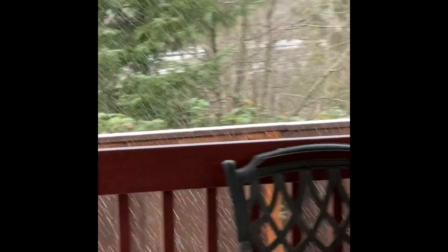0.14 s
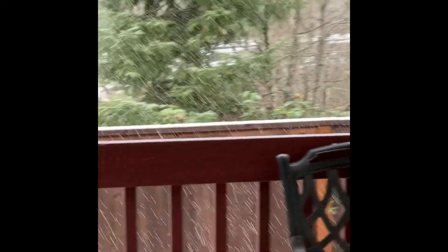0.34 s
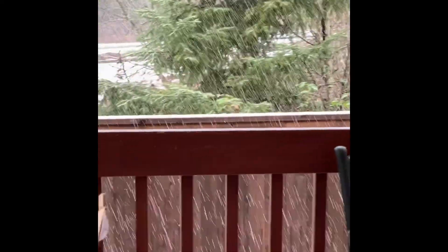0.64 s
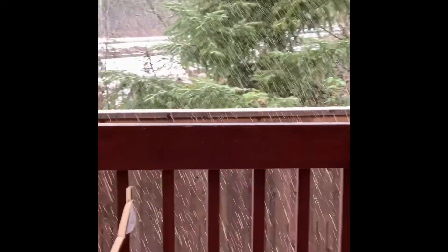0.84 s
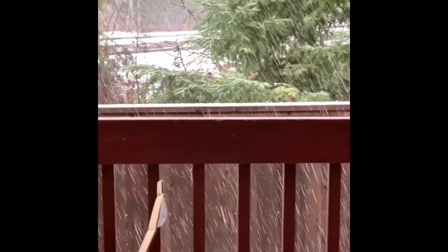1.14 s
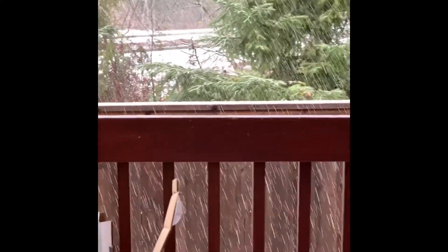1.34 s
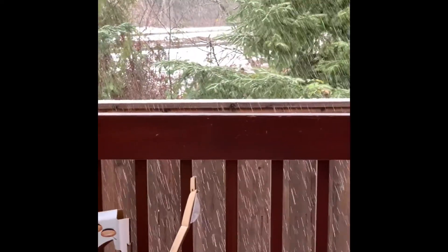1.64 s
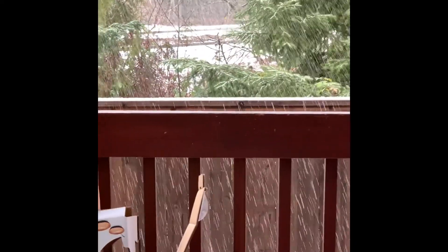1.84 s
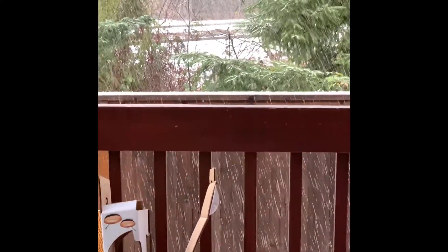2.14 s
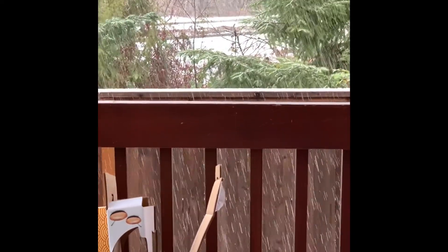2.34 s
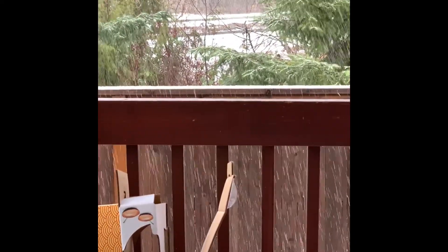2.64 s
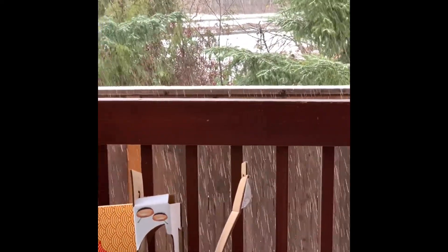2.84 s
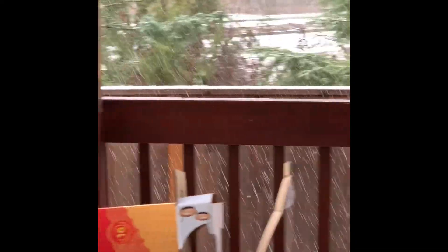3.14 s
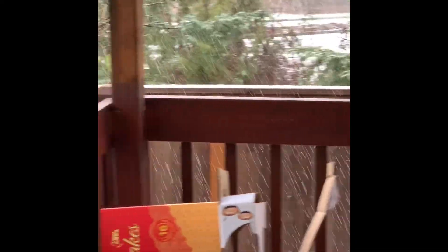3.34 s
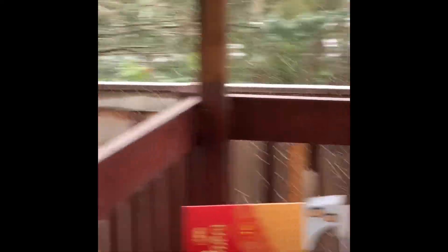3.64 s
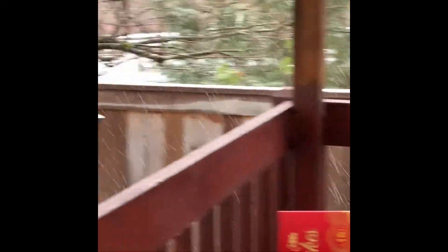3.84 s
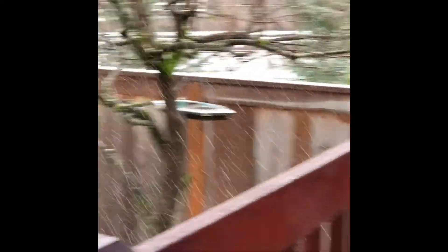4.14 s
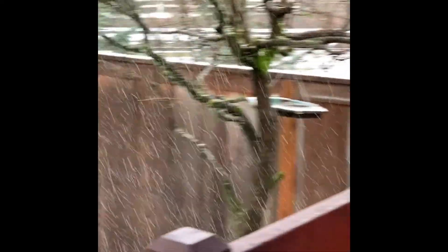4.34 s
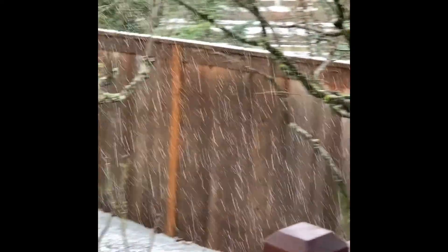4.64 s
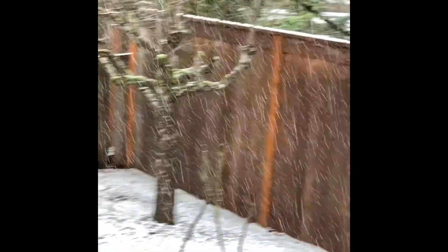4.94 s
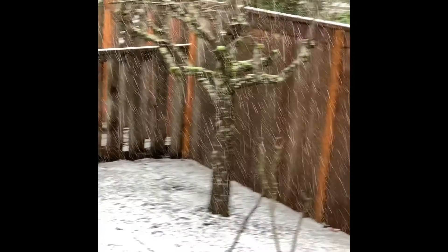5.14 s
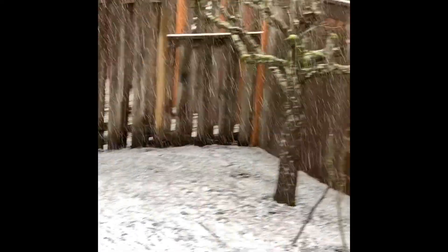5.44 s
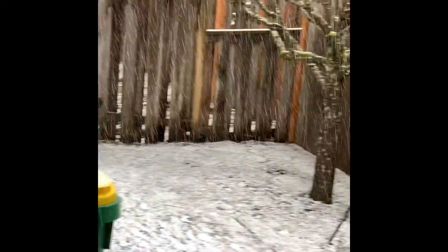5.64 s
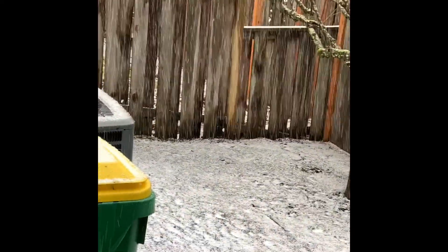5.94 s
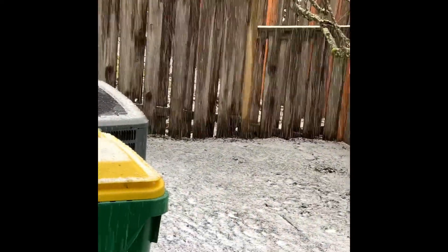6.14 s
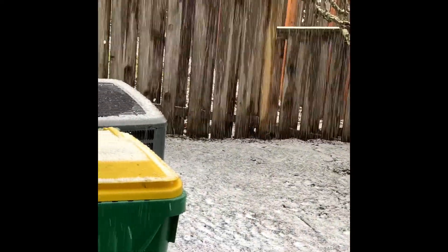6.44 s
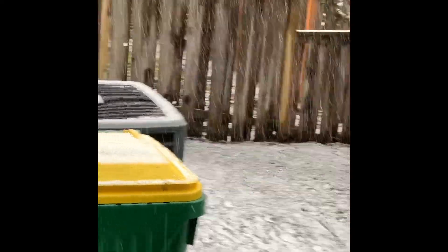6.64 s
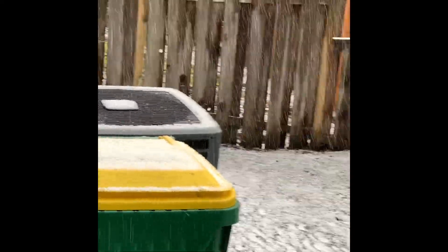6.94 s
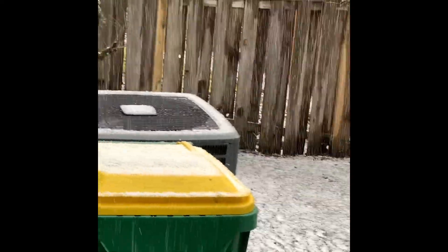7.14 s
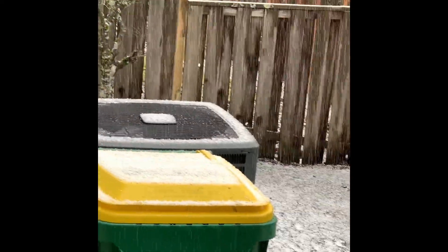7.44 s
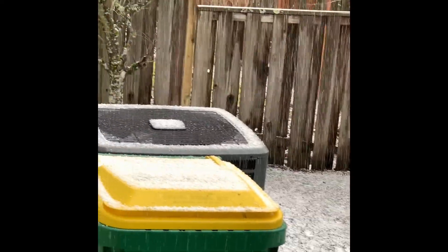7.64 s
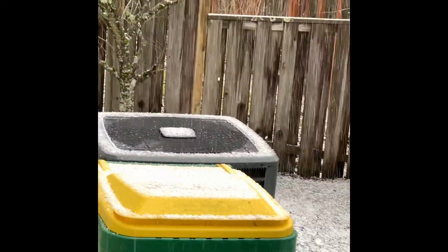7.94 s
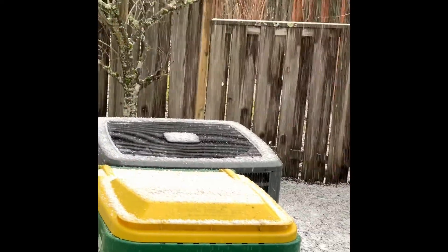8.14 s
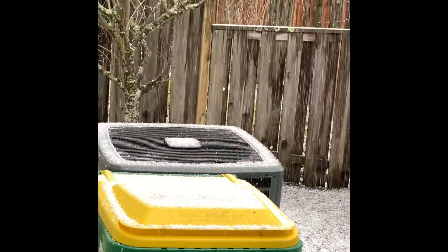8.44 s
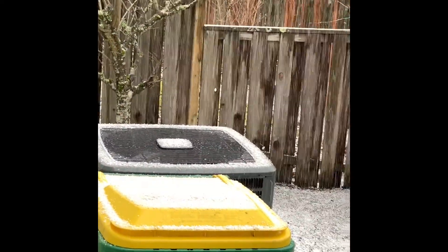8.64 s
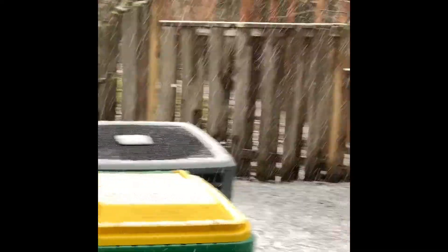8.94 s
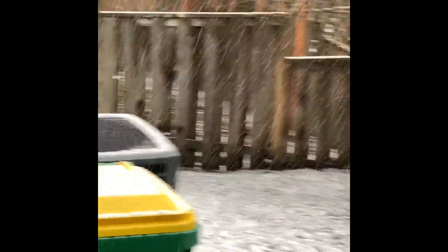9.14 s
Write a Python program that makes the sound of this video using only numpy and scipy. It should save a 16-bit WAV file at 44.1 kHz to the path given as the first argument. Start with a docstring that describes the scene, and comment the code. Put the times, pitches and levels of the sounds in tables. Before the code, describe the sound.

A thick shower of snow pellets falls on a backyard, heard from a wooden deck on a handheld stereo microphone. A bright, fine hiss from grass blends with a lower patter on fence and boards. Crisp ticks, dry woody taps and tiny pings scatter close by. A tiny rising gurgle passes early; soft wind bumps the microphone midway. The shower gradually weakens, over a very faint distant rumble and drone.

```python
"""A backyard under a shower of snow pellets, heard from a wooden deck through a phone's two microphone ports.
Far grains, as random coloured impulses, merge into a hiss on the lawn and a patter on fence and deck.
Near pellets tick, hop, tap and ping as short rings with bursts of noise and diffuse echoes.
The shower sinks as the phone turns from deck to lawn. Two gliding sines make a small rising gurgle;
filtered noise makes a low rumble and soft gusts, and noise with two wavering sines a distant drone."""
import sys
import numpy as np
from scipy import signal
from scipy.fft import rfft, irfft
from scipy.io import wavfile
from scipy.ndimage import map_coordinates

SR = 44100
rng = np.random.default_rng(int(sys.argv[2]) if len(sys.argv) > 2 else 0)


def unload_audio(sound):
    """Save the sound as a 16-bit wav file, at the path given as the first command line argument."""
    columns = np.transpose(np.atleast_2d(sound))
    # keep every value between -1 and 1, then stretch to whole-number steps
    steps = np.round(np.clip(columns, -1, 1) * 32767)
    wavfile.write(sys.argv[1], SR, steps.astype(np.int16))


N = 410130
TIME = np.arange(N) / SR  # seconds
FREQS = np.arange(N // 2 + 1) * SR / N  # Hz

# loudness of the whole shower, sinking as the phone turns toward the lawn: t/s, level/dB
SHOWER_LEVEL = [(0, -1), (.7, -1), (1.7, -1.45), (2.7, -1), (4.7, -2.06), (6.5, -3.5), (8.1, -4.5),
                (9.3, -4.5)]
# relative spectrum of far pellets on grass: f/Hz, level/dB per Hz
LAWN_SPECTRUM = [(1500, -11.5), (3500, -8), (5200, 4), (7000, 1.5), (9300, 4), (12000, 2), (14000, -1),
                 (15000, -21)]
LAWN_DB = -38  # at 0 dB of shower


def lawn(swell_db):
    """Far pellets on grass and needles merge into a fine hiss, broken by quick spatters."""
    impulses = grains(per_s=5000, scatter_db=1.5)
    hiss = patchy(colour(impulses, LAWN_SPECTRUM), patchy_db=3.5, per_s=30, width_hz=396)
    spatter_db = 1.6 * clumps(per_s=80, fade_s=.0045)
    return spread(hiss) * undb(LAWN_DB + curve(SHOWER_LEVEL) + swell_db + spatter_db)


# relative spectrum of far pellets on wood: f/Hz, level/dB per Hz
WOOD_SPECTRUM = [(200, -14), (450, -3), (780, -0.5), (1150, -2.5), (1550, -1.5), (2000, -2.5), (2700, -1),
                 (3800, -3), (5500, -12), (9000, -12.5)]
WOOD_DB = -37  # at 0 dB of shower
WOOD_SWELL_SHARE = 0.36  # how much of the shower's swell reaches the patter


def fence(swell_db):
    """Pellets on fence and deck patter lower and coarser than those on the lawn."""
    impulses = grains(per_s=2400, scatter_db=1.0)
    patter = patchy(colour(impulses, WOOD_SPECTRUM), patchy_db=2.5, per_s=35, width_hz=238.8)
    spatter_db = .5 * clumps(per_s=60, fade_s=0.02)
    level_db = WOOD_DB + curve(SHOWER_LEVEL) + WOOD_SWELL_SHARE * swell_db + spatter_db
    return spread(patter) * undb(level_db)


# thick clumps of pellets: t/s, swell level/dB
FLURRIES = [(.73, 0.5), (1.17, 3), (2.75, -0.5), (3.09, 2.5), (3.79, 0), (4.76, 6), (5.11, 2.5),
            (5.95, 6.5), (6.44, 2.5), (7.31, 5), (7.96, 2.5), (8.22, 3.5), (8.29, 3), (8.92, -0.5)]
FLURRY_WIDTH_S = .022


def flurries(surge_db, per_s):
    """Decibels by which the shower swells: thick clumps over a restless surge."""
    thick_db = sum(db * bell(s, FLURRY_WIDTH_S) for s, db in FLURRIES)
    return thick_db + surge_db * clumps(per_s, fade_s=0.02)


# sharp pellets close by: t/s, tick level/dB, tick f/Hz, board knock level/dB
TICKS = [(0.02, -17, 9500, -39), (0.0515, -18, 10000, -38), (0.1012, -17, 11500, -40),
         (0.128, -18, 11000, -40), (0.1412, -23, 9500, -35), (0.2183, -18, 9500, -39),
         (0.3034, -18, 10000, -25), (0.339, -15, 9000, -38), (0.349, -13, 10300, -37),
         (0.64, -15, 9500, -38), (0.7093, -9, 10300, -27), (0.7225, -15, 9500, -30),
         (0.742, -9.5, 9400, -27), (0.759, -20, 10000, -38), (0.7884, -14.5, 8800, -32),
         (0.799, -11.5, 9100, -36), (1.0355, -18, 10500, -42), (1.148, -10.5, 9900, -38),
         (1.1736, -14.5, 10500, -38), (1.284, -10.5, 11200, -19.5), (1.32, -1, 11400, -18),
         (1.438, -18, 10000, -38), (1.602, -10.5, 11000, -36), (1.6397, -14, 9600, -22),
         (1.7948, -12, 9700, -28), (1.8985, -12.5, 8300, -27.5), (1.9515, -20, 10000, -38),
         (2.058, -19, 7900, -28), (2.334, -16, 8000, -35), (2.436, -10, 10500, -25),
         (2.4454, -11, 10500, -38), (2.4937, -9.5, 9800, -34), (2.601, -10, 8400, -28),
         (2.6344, -9.5, 10100, -36), (2.7255, -14, 9000, -38), (2.7367, -7.5, 10000, -40),
         (2.8503, -9, 9700, -38), (2.894, -14, 9150, -40), (3.026, -7.5, 9000, -23),
         (3.0746, -12, 10300, -22), (3.1532, -8, 10400, -30), (3.1958, -9, 10300, -26),
         (3.279, -10, 10800, -27), (3.3858, -7.5, 8500, -44), (3.7062, -8.5, 9500, -46),
         (3.729, -9.5, 11500, -46), (3.805, -14, 10600, -28), (3.9842, -10, 10400, -30),
         (4.0085, -12, 10000, -38), (4.041, -11, 11500, -38), (4.0545, -17, 9800, -34),
         (4.0673, -11, 10200, -36), (4.3833, -13, 9200, -38), (4.4204, -6, 9600, -43),
         (4.5583, -10, 10400, -38), (4.644, -11.5, 8700, -34), (4.7352, -14, 9500, -34),
         (4.953, -15, 9000, -22), (4.9662, -9.5, 10000, -24), (5.0905, -10, 11000, -34),
         (5.2538, -23, 8000, -25), (5.2683, -21, 7300, -32), (5.9906, -13.5, 9000, -25),
         (6.269, -18, 9500, -38), (6.2925, -13, 9200, -34), (6.3652, -19, 7650, -25),
         (6.4875, -11.5, 10600, -17), (6.7878, -17, 11000, -38), (6.8255, -18, 10000, -37),
         (7.154, -13, 9300, -37), (7.239, -17, 10300, -30), (7.343, -16.5, 9300, -36),
         (7.412, -16.5, 8500, -40), (7.4905, -20, 10100, -39.5), (8.0092, -21, 9700, -36),
         (8.2785, -24, 9500, -24), (8.4314, -18, 9700, -42), (8.3386, -10.5, 7400, -41),
         (8.4574, -8, 10200, -38), (8.5795, -12, 9800, -37), (8.8694, -6.5, 8600, -40),
         (8.913, -11, 11000, -45), (8.9303, -11, 9400, -42), (8.948, -18, 8500, -35),
         (8.974, -16, 8200, -23.5), (9.111, -17, 8400, -35), (9.2756, -10, 10200, -47)]
# echo energy against the direct blow, for sharp ticks and for woody taps
TICK_ECHO_DB, TAP_ECHO_DB = -5.5, -1
HOP_LOSS_DB = 14  # how much softer a pellet lands after its bounce


def near_ticks():
    """Crisp ticks within reach knock the board; each pellet hops once and lands again more softly."""
    s, tick_db, hz, knock_db = np.transpose(TICKS)
    ticks = impacts(zip(s, tick_db, hz), cycles=.9, crack=.8, crack_s=.0006, bright=.7,
                    echo_db=TICK_ECHO_DB, echo_t60_s=.085)
    boards = zip(s, knock_db, rng.uniform(2350, 5300, len(s)))
    knocks = impacts(boards, cycles=1.0, crack=0.55, crack_s=0.0024, bright=3.7,
                     echo_db=TAP_ECHO_DB, echo_t60_s=0.11)
    hop_s = rng.uniform(0.02, 0.079, len(s))
    hops = np.column_stack([s + hop_s, tick_db - HOP_LOSS_DB, hz])
    others = stray(top_db=-15, range_db=8.5, low_hz=7000, high_hz=12500, count=850)
    small = impacts(np.vstack([hops, others]), cycles=.7, crack=.9, crack_s=.0004, bright=.75,
                    echo_db=-2.5, echo_t60_s=.025)
    return ticks + knocks + small


# duller pellets on rail and boards: t/s, level/dB, ring f/Hz
TAPS = [(0.077, -26, 2820), (0.301, -22, 3240), (0.407, -26, 1380), (0.9102, -21, 3160),
        (1.174, -18.5, 2640), (1.963, -22.5, 3200), (2.746, -28, 2300), (2.756, -25, 1900),
        (2.762, -27, 950), (3.545, -29, 1900), (3.623, -20, 2520), (4.054, -28, 1020), (4.055, -24, 2900),
        (4.148, -21, 3280), (4.274, -26, 1540), (4.287, -23, 2500), (4.29, -26, 1150), (4.368, -32, 1700),
        (4.607, -28, 1450), (5.09, -22, 3100), (5.121, -19, 3200), (6.477, -18.5, 3370), (6.518, -21, 2470),
        (7.044, -22.5, 3000), (7.969, -21, 3880), (9.032, -20, 3470)]
SNAP_DB, SNAP_HZ = -5, 7000  # ice snap: level against its tap, and ring pitch


def near_taps():
    """Dry, woody taps on rail and boards; the listed ones begin with a snap of ice, the stray ones do not."""
    loud = impacts(TAPS, cycles=1.0, crack=1.6, crack_s=.0016, bright=1.1,
                   echo_db=TAP_ECHO_DB, echo_t60_s=.09)
    onsets = [(s, db + SNAP_DB, SNAP_HZ) for s, db, hz in TAPS]
    snaps = impacts(onsets, cycles=.7, crack=1, crack_s=.0005, bright=.7,
                    echo_db=TICK_ECHO_DB, echo_t60_s=.06)
    others = stray(top_db=-27, range_db=8.5, low_hz=1680, high_hz=4400, count=320)
    small = impacts(others, cycles=0.94, crack=1.0, crack_s=0.0022, bright=0.64,
                    echo_db=TAP_ECHO_DB, echo_t60_s=0.096)
    return loud + snaps + small


# pellets on something that rings briefly, such as a twig or a lid: t/s, peak level/dB, ring f/Hz
PINGS = [(0.078, -28, 2740), (0.658, -29, 6900), (1.588, -28, 3900), (2.494, -28, 4530), (3.396, -29, 1160),
         (3.535, -28.5, 1030), (3.623, -28.5, 3640), (3.624, -28.5, 2450), (4.606, -33, 1600),
         (4.805, -29, 6360), (5.254, -25, 3400), (5.267, -36, 6680), (5.399, -28.5, 2890),
         (5.617, -28, 2350), (5.655, -31, 7450), (7.309, -33, 4480), (8.339, -28, 6800), (8.663, -32, 2830),
         (8.797, -32, 1590), (9.228, -33, 2640)]
PING_T60_S, PING_ECHO_DB = 0.014, 0


def near_pings():
    """A pellet sets one mode ringing for a moment, a decaying sine; the deck echoes it."""
    direct, echoes = np.zeros((2, N)), np.zeros((2, N))
    t = np.arange(2048) / SR
    for s, db, hz in PINGS:
        ring = undb(db - 60 * t / PING_T60_S) * np.sin(2 * np.pi * hz * t)
        add(direct, np.array([ring, ring]), s)
        add(echoes, scatter(ring, t60_s=0.078), s)
    return direct + undb(PING_ECHO_DB) * spread(echoes)


# two rising notes: start t/s, peak t/s, f/Hz at the peak, peak level/dB, rise of the last octave t/s
GURGLE_NOTES = [(1.479, 1.501, 1515, -31, .5), (1.438, 1.510, 1020, -33, .037)]
GURGLE_ATTACK_S, GURGLE_PEAK_S = .025, .005  # fade-in; width of the flare
GURGLE_LEAD_DB, GURGLE_FLUTTER_DB = -8, 1.5  # lead-in against the flare; its flutter
GURGLE_WAVER = .018  # pitch waver, as a fraction


def gurgle():
    """Two quick notes glide upward and flare at the top, like a bubble in meltwater, with a diffuse echo."""
    notes, wobble = 0, walk(90)
    for start, s, hz, db, octave_s in GURGLE_NOTES:
        fade_in = (TIME - start) / GURGLE_ATTACK_S
        fade_out = (s - TIME) / GURGLE_PEAK_S
        lead_in = np.clip(np.minimum(fade_in, fade_out), 0, 1)
        flutter = undb(GURGLE_LEAD_DB + GURGLE_FLUTTER_DB * wobble)
        loudness = np.maximum(flutter * lead_in, bell(s, GURGLE_PEAK_S))
        pitch = hz * (1 + GURGLE_WAVER * wobble) / (1 + np.maximum(s - TIME, 0) / octave_s)
        notes = notes + undb(db) * loudness * np.sin(2 * np.pi * np.cumsum(pitch) / SR)
    return notes + undb(-4) * scatter(notes, t60_s=0.7)[:, :N]


# relative spectrum of the outdoor rumble: f/Hz, level/dB per Hz
RUMBLE_SPECTRUM = [(24, -26), (36, -4), (46, 3.5), (70, 0.5), (100, -1.5), (130, -2.5), (190, -1.5),
                   (290, -1.5), (400, -3.5), (560, -13.5), (1200, -22.5)]
# loudness of the outdoor rumble: t/s, level/dB
RUMBLE_LEVEL = [(0, -41), (1.3, -43.5), (4.2, -44), (6.3, -45)]


def rumble():
    """A far rumble, wide low noise that fades as the phone turns."""
    noise = colour(rng.standard_normal((2, N)), RUMBLE_SPECTRUM)
    return spread(noise) * undb(curve(RUMBLE_LEVEL))


# relative spectrum of the distant drone's noise: f/Hz, level/dB per Hz
DRONE_SPECTRUM = [(110, -44), (140, -10), (157, -9), (175, -15), (220, -40)]
# two close lines that beat together: f/Hz, level/dB against the drone's noise
DRONE_LINES = [(146, -.5), (159, 1.5)]
DRONE_WAVER = 0.01096  # pitch waver, as a fraction


def drone():
    """A distant drone, narrow noise under two wavering sines, that fades as the phone turns."""
    tone = colour(rng.standard_normal(N), DRONE_SPECTRUM)
    for hz, db in DRONE_LINES:
        pitch = hz * (1 + DRONE_WAVER * walk(3.36))
        tone = tone + undb(db) * unit(np.sin(2 * np.pi * np.cumsum(pitch) / SR))
    return tone * undb(np.interp(TIME, [3.6, 5.2], [-56.3, -61]))


# relative spectrum of wind on the microphone: f/Hz, level/dB per Hz
GUST_SPECTRUM = [(15, -30), (30, -10), (45, 4), (70, 7.5), (110, -3), (200, -10.5), (500, -36)]
# wind brushing the microphone: peak t/s, peak level/dB, bell width t/s
GUSTS = [(4.05, -48, 0.055), (4.493, -41.5, 0.025), (4.62, -36.5, 0.052), (4.8, -50, .25),
         (4.825, -41, .023), (4.94, -39.5, 0.02), (5.123, -43.5, 0.053), (5.978, -47.5, 0.15),
         (7.62, -48, 0.083)]


def gusts():
    """Wind brushes the microphone: low noise in soft bell-shaped swells."""
    noise = colour(rng.standard_normal((2, N)), GUST_SPECTRUM)
    return spread(noise) * sum(undb(db) * bell(s, width_s) for s, db, width_s in GUSTS)


def impacts(rows, cycles, crack, crack_s, bright, echo_db, echo_t60_s):
    """Each pellet cracks and rings, the ring peaking after the given cycles, then echoes round the deck."""
    direct, echoes = np.zeros((2, N)), np.zeros((2, N))
    t = np.arange(400) / SR
    for s, db, hz in rows:
        age = t * hz / cycles
        ring = age * np.exp(1 - age) * np.sin(2 * np.pi * (hz * t + rng.random()))
        # crumbling ice adds a broad burst, centred on a multiple of the ring
        pole = np.exp(-2 * np.pi * bright * hz / SR)
        crumble = rng.standard_normal(len(t)) * np.exp(-t / crack_s)
        burst = signal.lfilter([1, -1], [1, -2 * pole, pole ** 2], crumble)
        # the ring's energy sets that of the whole blow, however it crumbles
        hit = undb(db) * np.std(ring) * unit(unit(ring) + crack * unit(burst))
        add(direct, aside(hit), s)
        add(echoes, scatter(hit, echo_t60_s), s)
    return direct + undb(echo_db) * spread(echoes)


def stray(top_db, range_db, low_hz, high_hz, count):
    """Rows for pellets that land at random; the far ones are many and weak."""
    when, area, pitch = rng.random((count, 3)).T
    s = when * N / SR
    # these pellets sink three times as many decibels as the shower
    db = top_db + 3.0 * curve(SHOWER_LEVEL, s) - range_db * np.log10(1 + 9 * area)
    return np.column_stack([s, db, low_hz * (high_hz / low_hz) ** pitch])


# spread, from pellet to pellet, of the level and delay differences between the ports
PORT_PAN_DB, PORT_LAG_S = 1.8, 6e-6


def aside(hit):
    """Each pellet differs a little in level and arrival time between the ports, each drawn on its own."""
    port = np.array([[.5], [-.5]])
    pan, lag = rng.standard_normal(2)
    hz = np.fft.rfftfreq(len(hit), 1 / SR)
    # a shared delay of two lags lets either port come first
    shift = np.exp(-2j * np.pi * hz * (port * lag + 2) * PORT_LAG_S)
    return irfft(rfft(hit) * undb(port * pan * PORT_PAN_DB) * shift, len(hit))


# the house wall thickens the echo tail: lag, smear, strength against the tail
WALL_S, WALL_SMEAR_S, WALL_DB = .0105, 0.0018, 1


def scatter(sound, t60_s):
    """Deck, walls and fence throw a sound back as a short diffuse tail, different on each side."""
    t = np.arange(4096) / SR
    wall = undb(WALL_DB) * np.exp(-((t - WALL_S) / WALL_SMEAR_S) ** 2)
    fade = undb(-60 * t / t60_s) * (1 + wall)
    tail = rng.standard_normal((2, len(t))) * fade / np.sqrt(np.sum(fade ** 2))
    return signal.fftconvolve(sound[None], tail, axes=1)


def grains(per_s, scatter_db):
    """Two streams of tiny impacts at random moments, each with its own size and sign."""
    lands = rng.random((2, N)) < per_s / SR
    size = undb(scatter_db * np.clip(rng.standard_normal((2, N)), -2, 2))
    return lands * size * rng.choice([-1, 1], (2, N))


def clumps(per_s, fade_s):
    """A level curve that jumps at random and trails off: mean 0 and spread 1, then capped at 3."""
    lands = (rng.random(N) < per_s / SR) * 1.
    swell = signal.lfilter([1], [1, -np.exp(-1 / (fade_s * SR))], lands)
    return np.minimum(unit(swell - swell.mean()), 3)


def patchy(x, patchy_db, per_s, width_hz):
    """Every patch of surface is struck in its own rhythm, so frequency bands flicker apart."""
    hz, s, bands = signal.stft(x, SR, nperseg=512)
    field = rng.standard_normal((256, 1024))
    place = np.meshgrid(hz / width_hz, s * per_s, indexing="ij")
    flicker_db = patchy_db * map_coordinates(field, place, order=1, mode="wrap")
    return unit(signal.istft(bands * undb(flicker_db), SR)[1][:, :N])


# how alike the two ports hear diffuse sound: f/Hz, coherence (0-1)
PORT_LIKENESS = [(60, 0.99), (160, 0.86), (330, 0.9), (600, 0.02), (1000, 0.37), (1500, 0.45), (2200, 0.27),
                 (3300, 0.23), (4300, 0.32), (5000, 0.74), (6200, 0.54), (7500, 0.6), (9800, 1),
                 (13000, 0.9), (14800, 1)]


def spread(pair):
    """Two unrelated sounds become left and right of a field with the ports' coherence."""
    alike = np.clip(across(PORT_LIKENESS), 0, .99)
    shares = np.sqrt([(1 + alike) / 2, (1 - alike) / 2])
    common, apart = irfft(rfft(pair) * shares, N)
    return np.array([common + apart, common - apart])


def undb(db):
    """Decibels to gain."""
    return 10 ** (np.asarray(db) / 20)


def unit(x):
    """Scale to rms 1."""
    return x / np.sqrt(np.mean(x ** 2))


def curve(rows, t=TIME, axis=1):
    """One column of a table, joined by straight lines."""
    rows = np.array(rows)
    return np.interp(t, rows[:, 0], rows[:, axis])


def across(points):
    """(Hz, value) points joined on a log-frequency axis."""
    hz, value = np.transpose(points)
    return np.interp(np.log(FREQS + 1), np.log(hz), value)


def colour(x, points):
    """Filter x by a spectrum, at rms 1."""
    return unit(irfft(rfft(x) * undb(across(points)), N))


def walk(rate):
    """Smooth random wandering, low-passed near the rate in Hz, at rms 1."""
    return unit(irfft(rfft(rng.standard_normal(N)) / (1 + (FREQS / rate) ** 4), N))


def bell(s, width_s):
    """A smooth swell that peaks at time s."""
    return np.exp(-.5 * np.minimum(np.abs(TIME - s) / width_s, 10) ** 2)


def add(out, sound, s):
    """Mix a stereo sound in at time s."""
    start = int(np.clip(s * SR, 0, N - 1))
    out[:, start:start + sound.shape[1]] += sound[:, :N - start]


def scene():
    """The whole yard: shower, near pellets, gurgle and the air behind them."""
    swell_db = flurries(surge_db=1.57, per_s=16)
    shower = lawn(swell_db) + fence(swell_db)
    pellets = near_ticks() + near_taps() + near_pings()
    background = rumble() + drone() + gusts()
    return shower + pellets + gurgle() + background


# how much louder the left port is: f/Hz, level/dB
PORT_BALANCE = [(130, -1), (280, 1.5), (550, 2), (1100, -0.5), (2400, 0.5), (6000, 0.5), (9000, -0.5)]
# phase by which the left port leads: f/Hz, phase/rad
PORT_LEAD = [(20, 0), (600, 0), (950, -.8), (1850, .1), (2500, -.7), (3300, -1.4), (4000, -.6), (4700, 3.1),
             (5400, 3.4), (7000, 6.2), (9800, 9.42), (11800, 12.2), (13000, 12.9), (14500, 15.7)]
# treble roll-off of the microphone: f/Hz, level/dB
MICROPHONE_ROLLOFF = [(13000, 0), (14600, -3), (16000, -9)]
TOP_HZ = 16000  # upper limit of the sound


def record(dry):
    """The ports differ in level and phase by frequency; the microphone rolls off at the top."""
    side_db = across(PORT_BALANCE) / 2
    lag = np.exp(-1j * curve(PORT_LEAD, FREQS))
    ports = np.array([undb(side_db), undb(-side_db) * lag])
    heard = irfft(rfft(dry) * ports * undb(across(MICROPHONE_ROLLOFF)), N)
    lowpass = signal.ellip(8, .2, 70, TOP_HZ, fs=SR, output="sos")
    return signal.sosfilt(lowpass, heard)


dry = scene()
out = record(dry)
unload_audio(out)
```